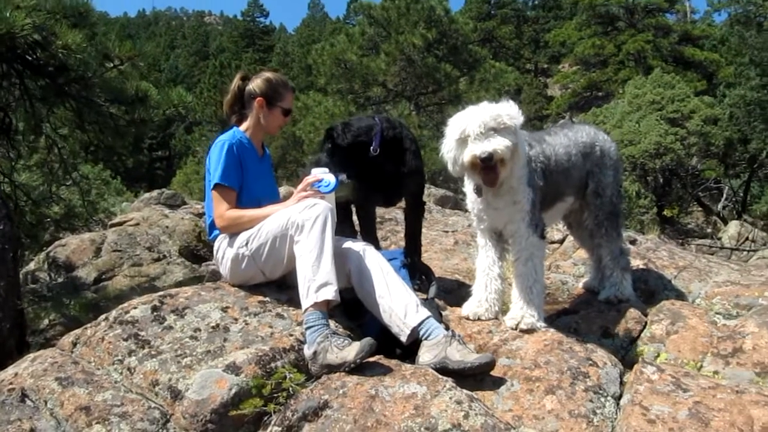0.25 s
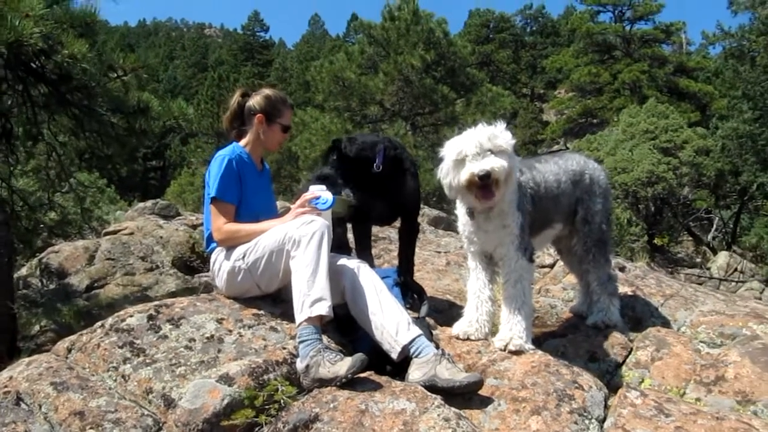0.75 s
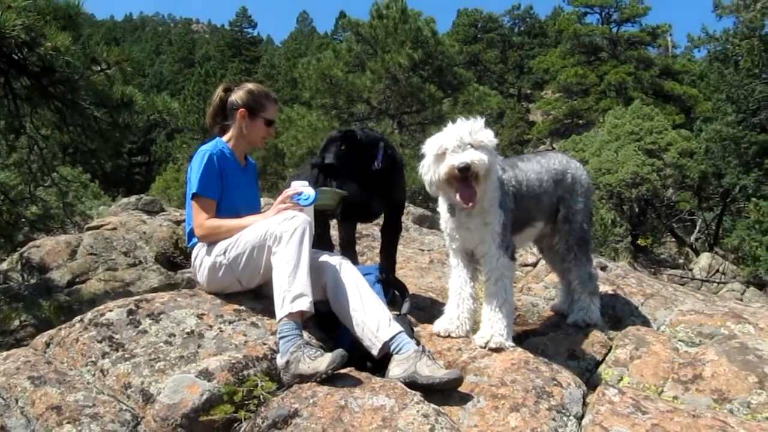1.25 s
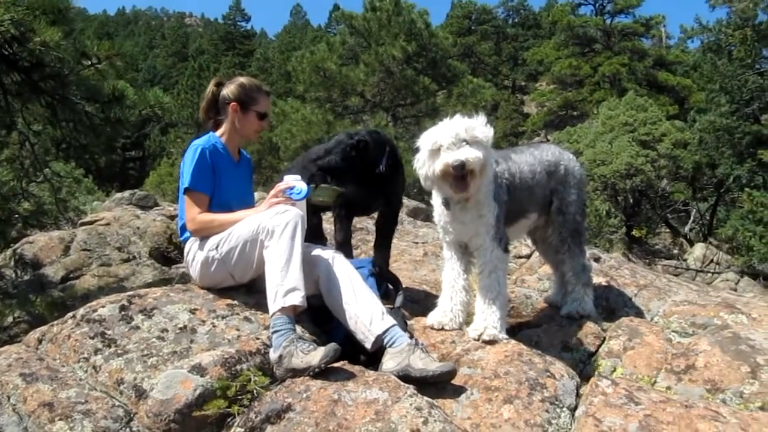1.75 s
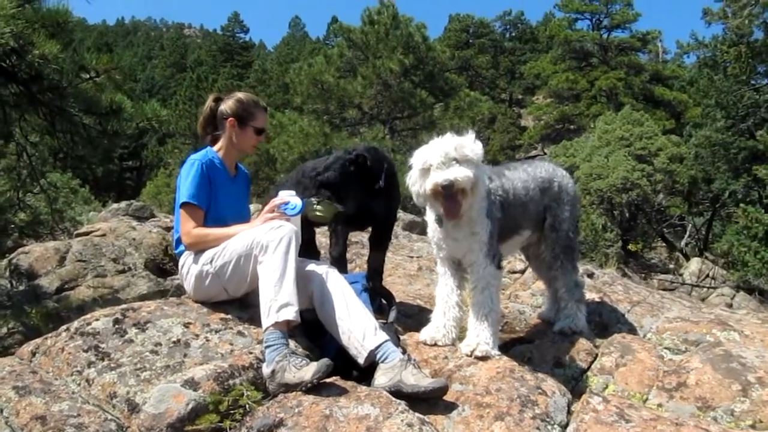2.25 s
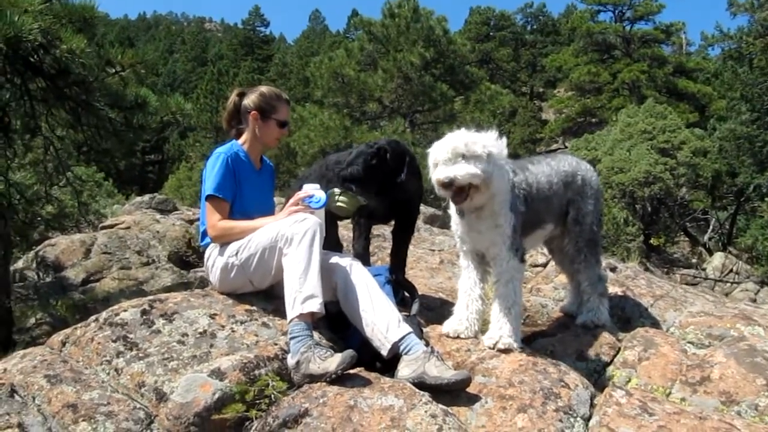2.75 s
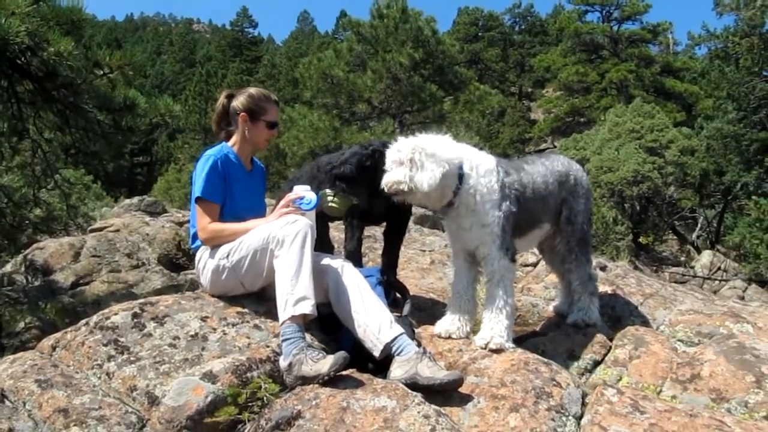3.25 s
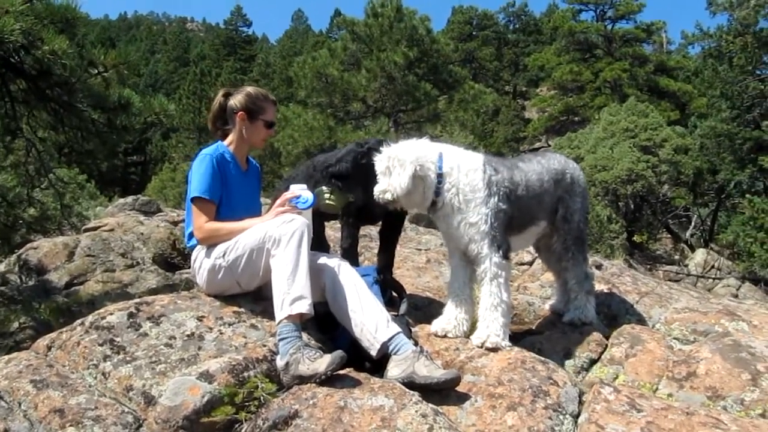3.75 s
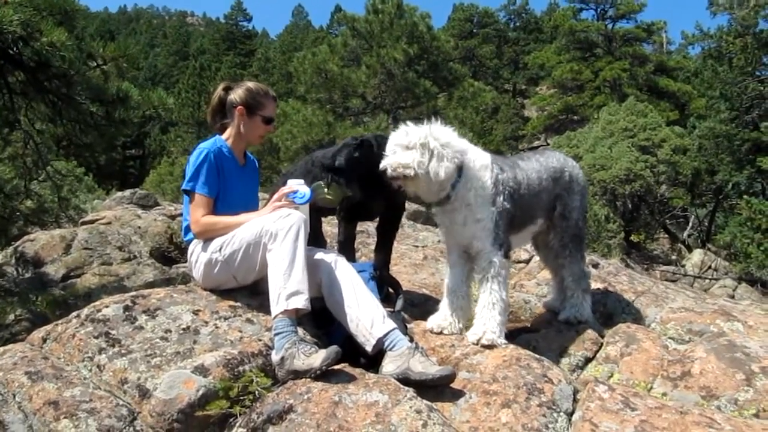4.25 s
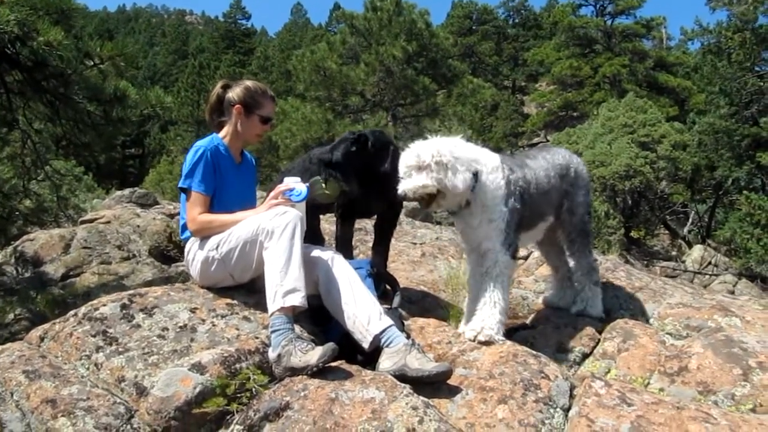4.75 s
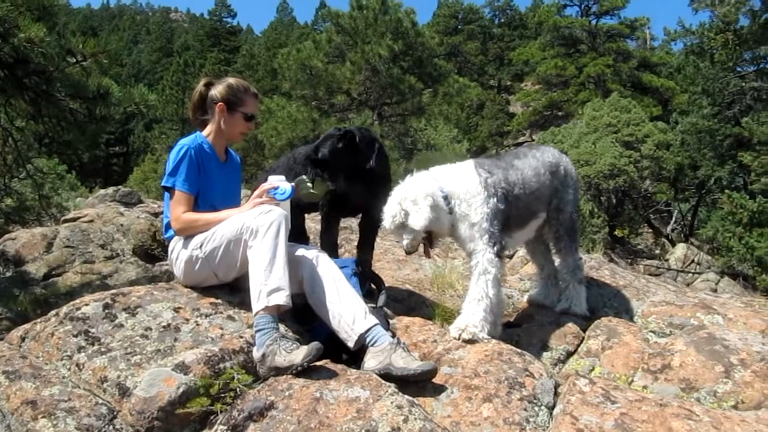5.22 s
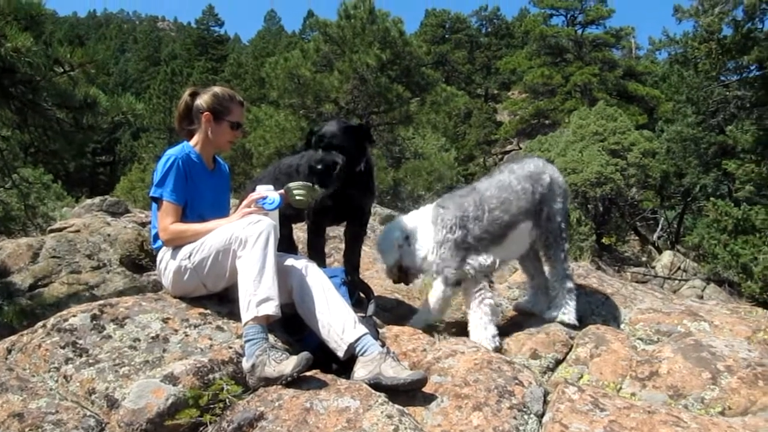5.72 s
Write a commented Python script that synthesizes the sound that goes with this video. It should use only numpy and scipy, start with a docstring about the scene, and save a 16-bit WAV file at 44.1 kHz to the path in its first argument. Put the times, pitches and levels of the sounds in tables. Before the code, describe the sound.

A dog drinks from a small cup outdoors, roughly three laps a second throughout. Each lap is a small cluster of hollow, bubbly plops, wet slaps, crackling spray and ticking drips, soft at first and fuller from about 2 seconds, strongest around 4.3 to 4.7. A second dog pants close by, breathy puffs about every 0.3 seconds until 3.1, then only a few at 4.3, 4.9 and 5.3. Behind are quiet air, a low wavering drone that fades after the first second, faint pine hiss, and a barely audible high insect-like trill and thin steady whine. Wind rumble rises after 2.2, thumping the microphone hardest at 3.3 to 4.0, again near 4.9 and 5.4. The cup snaps sharply at 4.98. Claws scrape faintly from 5.4, with harsh gritty clicks at 5.75; light metal tags clink at 5.6 and 5.9. Close reflections only, no room echo.

```python
"""On a rocky hilltop a dog laps water from a small cup, three laps a second, and pants as it drinks. Each lap
is a few plops of trapped air, made as ringing bubbles, and a spray of tiny bursts of noise. Shaped noise makes
the air, pines, far drone, panting and the wind that rises and buffets the microphone. Near the end the cup
snaps once, claws scrape on the rock in gritty clicks and metal collar tags clink."""
import sys
import numpy as np
from scipy import signal
from scipy.fft import rfft, irfft
from scipy.io import wavfile
from scipy.ndimage import uniform_filter1d, map_coordinates

SR = 44100
rng = np.random.default_rng(int(sys.argv[2]) if len(sys.argv) > 2 else 0)


def log_audio(samples):
    """Write samples as a 16-bit WAV file to the path given in sys.argv[1]."""
    # one column per channel
    frames = np.atleast_2d(samples).T
    # limit to full scale, then quantise
    limited = np.clip(frames, -1, 1)
    pcm = np.round(limited * 32767).astype(np.int16)
    wavfile.write(sys.argv[1], SR, pcm)


N = 263718
TIME = np.arange(N) / SR


def gain_of(db):
    """Turns decibels into a plain multiplier."""
    return 10 ** (np.asarray(db) / 20)


def evened(x):
    """Scales a sound to an average strength (rms) of 1."""
    return x / np.sqrt(np.mean(x ** 2) + 1e-20)


def level(curve):
    """The multiplier at every sample, drawn through rows of t/s, level/dB."""
    return gain_of(np.interp(TIME, *np.transpose(curve)))


def add(mix, s, sound):
    """Mixes a sound in, starting at time s."""
    part = mix[max(round(s * SR), 0):][:len(sound)]
    part += sound[:len(part)]


def gains(points, size):
    """Reads a colour, given as rows of f/Hz, level/dB, at each frequency of an FFT."""
    hz, db = np.transpose(points)
    fft_hz = np.fft.rfftfreq(size, 1 / SR)
    return gain_of(np.interp(np.log(fft_hz + 1), np.log(hz), db))


def noise(points):
    """Steady noise of a given colour, rms 1."""
    spectrum = rfft(rng.standard_normal(N))
    return evened(irfft(spectrum * gains(points, N), N))


def click(points, size=512):
    """A click of a given colour with its energy packed at the start (minimum phase), energy 1."""
    cepstrum = irfft(np.log(gains(points, size)))
    # folding the second half onto the first leaves nothing before the click starts
    cepstrum[1:size // 2] *= 2
    cepstrum[size // 2 + 1:] = 0
    pulse = irfft(np.exp(rfft(cepstrum)))
    return pulse / np.linalg.norm(pulse)


def band(x, lo_hz, hi_hz, order=2):
    """Keeps mainly the sound between two frequencies."""
    edges_hz = [lo_hz, min(hi_hz, SR / 2 - 1)]
    return signal.sosfilt(signal.butter(order, edges_hz, "band", fs=SR, output="sos"), x)


def swell(length_s, taper):
    """A smooth rise, hold and fall; taper is the share spent rising and falling."""
    return signal.windows.tukey(int(length_s * SR), taper)


def bubble(hz, t60_s, glide, rise_turns):
    """A pocket of air rings and dies, its pitch sliding as it changes size."""
    t = np.arange(int(t60_s * SR) + 2) / SR
    turns = np.cumsum(hz * np.exp(glide * t / t60_s)) / SR
    fade = gain_of(-60 * t / t60_s)
    return np.sin(2 * np.pi * turns) * fade * (1 - np.exp(-turns / rise_turns))


def splat(hz, t60_s, ring_share=0.28, width=0.15):
    """A wet film tears: a tiny burst of noise that partly rings at one pitch, energy 1."""
    t = np.arange(int(t60_s * SR) + 16) / SR
    burst = rng.standard_normal(len(t)) * t * gain_of(-80 * t / t60_s)
    share = np.clip(ring_share, 0, 1)
    ringing = evened(band(burst, hz / (1 + width / 2), hz * (1 + width / 2), order=1))
    sound = share * ringing + (1 - share) * evened(burst)
    return sound / np.linalg.norm(sound)


def ring(modes, size=10000):
    """A struck solid rings as a sum of fading tones, one for each mode."""
    t = np.arange(size) / SR
    return sum(gain_of(db - 60 * t / t60) * np.sin(2 * np.pi * hz * t) for hz, db, t60 in modes)


# Colour of the still air and trees [f/Hz, level/dB]
AIR_COLOUR = [(18, -46), (30, 5), (77, -5.5), (134, 2.5), (194, -4), (364, -4.5), (540, -4), (1320, -13),
              (1810, -18.5), (2120, -19.5), (6550, -40), (7870, -28), (8520, -31), (11400, -41),
              (16000, -40)]
# Loudness of the air over time, before its layer gain [t/s, level/dB]
AIR_LEVEL = [(0.0, -44.5), (2.65, -41), (5.98, -47)]
# Colour of the high hiss of the pines [f/Hz, level/dB]
PINES_COLOUR = [(1500, -20), (3000, 7.5), (4500, 5.5), (7000, 0), (10500, 1), (15500, -12)]
# Loudness of the pines over time [t/s, level/dB]
PINES_LEVEL = [(0, -50), (.9, -50.5), (1.5, -56.5), (2.6, -60), (3.6, -63), (5.98, -50)]
# Colour of a far drone [f/Hz, level/dB]
DRONE_COLOUR = [(80, -7), (135, 2), (220, 5), (360, 3.5), (480, -13.5), (900, -22), (4000, -60)]
# Loudness of the far drone over time [t/s, level/dB]
DRONE_LEVEL = [(0, -32.5), (.25, -34), (.6, -31.5), (1, -44), (1.6, -43), (2.4, -42.5), (3.2, -59),
               (5.98, -45)]


def hilltop(air_db=1, hum_db=-6, hum_hz=144):
    """Open air, pines and a far drone are shaped noise; a narrow band of noise makes the drone's wavering hum."""
    air = noise(AIR_COLOUR)
    # the air's loudness is set by its middle band
    air = air / np.std(band(air, 400, 1500))
    hum = evened(band(rng.standard_normal(N), hum_hz - 6, hum_hz + 6))
    drone = noise(DRONE_COLOUR) + gain_of(hum_db) * hum
    out = gain_of(air_db) * level(AIR_LEVEL) * air
    out += level(PINES_LEVEL) * noise(PINES_COLOUR)
    return out + level(DRONE_LEVEL) * drone


def trill(db=-67.0, hz=11400, width_hz=300, first_s=0.24, length_s=0.4):
    """A faint high trill, perhaps an insect: narrow noise that comes and goes once a second."""
    bouts = np.zeros(N)
    for s in np.arange(first_s, N / SR, 1):
        add(bouts, s, swell(length_s, taper=0.32))
    tone = evened(band(rng.standard_normal(N), hz - width_hz / 2, hz + width_hz / 2))
    return gain_of(db) * bouts * tone


# Strength of the breeze on the microphone, before the layer gains [t/s, level/dB]
BREEZE_LEVEL = [(2.2, -58), (2.47, -30.5), (3.32, -22.5), (3.49, -31), (3.67, -16), (3.75, -18.5),
                (4.12, -29), (4.15, -41), (4.18, -24), (4.65, -33.5), (4.96, -17), (5.01, -39.5),
                (5.31, -24.5), (5.34, -36), (5.38, -20), (5.44, -30.5), (5.86, -38), (5.98, -44)]
# Colour of the wind's low rumble [f/Hz, level/dB]
RUMBLE_COLOUR = [(8, 0.5), (25, 5), (60, -0.5), (120, -11.5), (250, -24.5), (500, -40), (4000, -100)]
# Colour of the wind's turbulence [f/Hz, level/dB]
TURBULENCE_COLOUR = [(30, -15), (90, 6), (180, -7), (300, -4), (600, -23), (3000, -82)]
# The strongest eddies that hit the microphone [middle t/s, length t/s, level/dB, upper edge f/Hz]
EDDY_HITS = [(1.295, 0.047, -21, 122), (2.749, 0.06, -14, 176), (2.831, 0.086, -22, 186),
             (3.319, 0.024, -6.5, 316), (3.361, 0.12, -19.5, 170), (3.444, 0.031, -13.5, 225),
             (3.48, 0.037, -9, 172.5), (3.62, 0.035, -14.5, 294), (3.67, 0.037, -10.5, 129),
             (3.703, .05, -9.5, 183), (3.746, .09, -16.5, 216), (3.863, 0.022, -7, 436),
             (3.9, 0.084, -17.5, 273), (3.932, 0.021, -6, 564), (3.95, 0.043, -7, 320),
             (4.079, 0.035, -21.5, 150), (4.188, 0.046, -18, 137), (4.244, 0.031, -20, 184),
             (4.322, 0.035, -18.5, 117), (4.905, 0.064, -12, 207), (4.917, 0.032, -12.5, 440),
             (4.945, 0.067, -12.5, 148), (5.379, 0.025, -15.5, 169)]


def wind(breeze_db=2, turbulence_db=-28, growth=1.63, eddy_db=0, centre=0.32, calm_until_s=2.08, rise_s=0.255):
    """Moving air makes a low rumble, turbulence that grows faster than the breeze, and single eddies."""
    breeze = level(BREEZE_LEVEL) * np.clip((TIME - calm_until_s) / rise_s, 0, 1)
    out = gain_of(breeze_db) * breeze * noise(RUMBLE_COLOUR)
    out += gain_of(turbulence_db) * (breeze / breeze.max()) ** growth * noise(TURBULENCE_COLOUR)
    for s, length_s, db, hz in EDDY_HITS:
        gust = swell(length_s, taper=0.9)
        f = np.fft.rfftfreq(len(gust), 1 / SR) / (centre * hz)
        # random phases under a hump that falls away towards the upper edge
        hump = f ** 2 * np.exp(-1.4 * f + 2j * np.pi * rng.random(len(f)))
        eddy = evened(irfft(hump, len(gust)) * gust) * np.sqrt(np.mean(gust ** 2))
        add(out, s - len(gust) / SR / 2, gain_of(db + eddy_db) * eddy)
    return out


# Claws on the rock [t/s, length t/s, level/dB, slips per second f/Hz]
CLAW_SCRAPES = [(5.442, 0.089, -45, 181), (5.658, 0.056, -37.5, 294), (5.7418, 0.0063, -19, 900),
                (5.747, 0.01, -14.5, 1500), (5.754, 0.012, -26, 457), (5.767, 0.0291, -27.5, 600),
                (5.808, 0.007, -18, 1100), (5.843, 0.11, -49.5, 400)]
# Colour of scraped rock, also used for the tags' chatter [f/Hz, level/dB]
ROCK_COLOUR = [(300, -15), (1200, -4.5), (3300, 3), (4800, 0.5), (7500, -9), (10800, -2), (15500, -22)]


def claws(size_db=4, grit=0.25, slip_s=0.00045):
    """A claw slips over grains of rock in an uneven rush of gritty clicks."""
    out = np.zeros(N)
    for s, length_s, db, per_s in CLAW_SCRAPES:
        n = int(length_s * SR)
        slips = np.zeros(n)
        at = rng.integers(0, n, int(length_s * per_s) + 1)
        slips[at] = gain_of(size_db * rng.standard_normal(len(at)))
        # each slip starts suddenly and dies away
        fading = signal.lfilter([1], [1, -np.exp(-1 / (slip_s * SR))], slips)
        force = evened(fading) + grit
        add(out, s, gain_of(db) * evened(force * rng.standard_normal(n)))
    return signal.oaconvolve(out, click(ROCK_COLOUR))[:N]


# Collar tags touching, before the layer gains [t/s, level/dB, share of the second tag 0-1]
TAG_CLINKS = [(5.5922, -27.5, 0.21), (5.886, -24.5, 0.8), (5.897, -29.5, 1), (5.973, -36.5, 1)]
# Ringing modes of the first tag [f/Hz, level/dB, time to fall 60 dB t/s]
FIRST_TAG_MODES = [(4850, -1.5, 0.0564), (10300, -16, 0.076), (13640, -5.5, 0.095)]
# Ringing modes of the second tag [f/Hz, level/dB, time to fall 60 dB t/s]
SECOND_TAG_MODES = [(6533, -12, 0.07), (10160, -4.5, 0.14), (11560, -15, 0.066), (13730, -7, 0.071)]


def tags(ring_db=3, chatter_db=-3, chatter_t60_s=0.039, size=4000):
    """Two thin metal tags ring, chattering against each other as they touch."""
    out, t = np.zeros(N), np.arange(size) / SR
    for s, db, share in TAG_CLINKS:
        ringing = (1 - share) * ring(FIRST_TAG_MODES) + share * ring(SECOND_TAG_MODES)
        add(out, s, gain_of(db + ring_db) * ringing)
        # cubing the noise makes it spiky
        chatter = evened(rng.standard_normal(size) ** 3) * gain_of(-60 * t / chatter_t60_s)
        add(out, s, gain_of(db + chatter_db) * np.convolve(chatter, click(ROCK_COLOUR)))
    return out


# The cup flexes: two close parts of one snap [t/s, level/dB]
CUP_SNAPS = [(4.9802, -14.5), (4.9809, -2)]
# Ringing modes of the cup [f/Hz, level/dB, time to fall 60 dB t/s]
CUP_MODES = [(1224, -16, 0.026), (1970, -9, 0.0087), (3100, 0.5, 0.012), (5440, -9.5, 0.0034),
             (7860, -10.5, 0.0043), (9540, -11.5, 0.005), (11050, -12.5, 0.0062), (12500, -18, 0.0057)]


def cup(crunch_db=-9, crunch_t60_s=0.012, rise_s=.0001):
    """The stiff little cup flexes and snaps: its modes ring, with a short dull crunch."""
    out, body = np.zeros(N), ring(CUP_MODES)
    body = body * (1 - np.exp(-np.arange(len(body)) / SR / rise_s))
    for s, db in CUP_SNAPS:
        crunch = band(splat(2000, crunch_t60_s), 670, 3700)
        add(out, s, gain_of(db) * body)
        add(out, s, gain_of(db + crunch_db) * crunch / abs(crunch).max())
    return out


# The dog's pants, before the layer gain [middle of the puff out t/s, level/dB]
PANT_PUFFS = [(0.068, -47), (0.238, -45.5), (0.539, -45), (0.838, -45), (1.147, -41.5), (1.451, -46),
              (1.746, -47), (1.994, -48), (2.256, -44.5), (2.536, -45), (2.786, -47), (3.1, -50),
              (4.267, -54), (4.906, -48), (5.329, -48.5)]
# Colour of breath through the open muzzle [f/Hz, level/dB]
MUZZLE_COLOUR = [(500, -16), (1300, -2), (1800, -6.5), (2150, 4.5), (2500, -3), (2950, 8.5), (3300, 1.5),
                 (3800, -10.5), (4800, -11.5), (12000, -31)]
# each puff out is followed by a weaker draw of air in
PUFF_S, DRAW_S, DRAW_LAG_S, DRAW_DB = .11, .09, .138, -8.5


def panting(db=4.5, rasp_db=2, opening=.07, taper=.7, size=200):
    """Air hisses out and in through the dog's open muzzle, fluttering over the wet tongue."""
    flow = np.zeros(N)
    for s, puff_db in PANT_PUFFS:
        add(flow, s - PUFF_S / 2, gain_of(puff_db) * swell(PUFF_S, taper))
        add(flow, s + DRAW_LAG_S - DRAW_S / 2, gain_of(puff_db + DRAW_DB) * swell(DRAW_S, taper))
    # the mouth opens with the effort: reading the noise faster raises its resonances
    pace = 1 + opening * (np.sqrt(flow / flow.max()) - .5)
    hiss = map_coordinates(noise(MUZZLE_COLOUR), [np.cumsum(pace)], mode="wrap")
    flutter = gain_of(rasp_db * evened(uniform_filter1d(rng.standard_normal(N), size)))
    return gain_of(db) * flow * evened(flutter * hiss)


# Strokes of the tongue [t/s, length t/s, level/dB]; the level drives spray and gurgle
TONGUE_LAPS = [(0.1, 0.087, -54), (0.406, 0.15, -46), (0.6, 0.25, -48), (0.955, 0.14, -53),
               (1.18, 0.055, -49), (1.488, 0.08, -47.5), (1.765, 0.15, -49.5), (2.079, 0.098, -44),
               (2.379, 0.099, -48), (2.655, 0.12, -46), (3.041, 0.087, -44.5), (3.328, 0.1, -46.5),
               (3.642, 0.113, -48.5), (3.97, 0.069, -51.5), (4.278, 0.092, -45.5), (4.632, 0.13, -41),
               (4.992, 0.099, -48), (5.293, 0.15, -48)]


def lap_flow():
    """How much water the tongue is throwing at each moment."""
    flow = np.zeros(N)
    for s, length_s, lap_db in TONGUE_LAPS:
        add(flow, s, gain_of(lap_db) * swell(length_s, taper=0.38))
    return flow


def gurgle(db=-3, per_s=170, size_db=4, between_db=-52, cycles=30, rise=0.32, count=30):
    """Small bubbles pop in the stirred water, mostly rising in pitch, and go on between the laps."""
    pops = np.zeros(N)
    for hz in np.geomspace(1100, 6000, count):
        sizes = gain_of(size_db * np.minimum(rng.exponential(1, N), 3))
        hits = (rng.random(N) < per_s / count / SR) * sizes
        pop = bubble(hz, cycles / hz, rng.normal(rise, rise), rise_turns=2.9)
        pops += signal.oaconvolve(hits, pop)[:N]
    return gain_of(db) * evened(pops) * np.hypot(lap_flow(), gain_of(between_db))


# Colour of spray, also used for the drips and ticks [f/Hz, level/dB]
SPRAY_COLOUR = [(400, -46.5), (1200, 2), (3000, 3), (5000, 2.5), (7500, -4.5), (10500, 4.5), (15500, -16.5)]


def spray(db=1, per_s=800, size_db=4, between_db=-58, t60_s=0.0057, count=40):
    """Droplets and bursting films crackle, strong during each lap and faint as the muzzle drips in between."""
    drops = np.zeros(N)
    for hz in np.geomspace(1000, 12000, count):
        sizes = gain_of(size_db * np.minimum(rng.exponential(1, N), 3.5))
        hits = (rng.random(N) < per_s / count / SR) * sizes
        # small drops ring higher and tend to die sooner
        grain = splat(hz, t60_s * np.sqrt(4000 / hz) * rng.uniform(0.29, 2.6), ring_share=0.73)
        drops += signal.oaconvolve(hits, grain)[:N]
    coloured = evened(signal.oaconvolve(drops, click(SPRAY_COLOUR))[:N])
    return gain_of(db) * coloured * np.hypot(lap_flow(), gain_of(between_db))


def dribble(plop_db=-32, tick_db=-32, plop_hz=1600, tick_hz=7000, plop_octaves=0.84, tick_octaves=.6,
            t60_s=0.027, tick_t60_s=0.0092, count=2):
    """Every lap spills a few soft plops back into the cup and makes a few faint ticks."""
    out = np.zeros(N)
    for (s, length_s, _), draws in zip(TONGUE_LAPS, rng.random((len(TONGUE_LAPS), count, 4))):
        for fall, plop_pitch, when, tick_pitch in draws:
            low_hz = plop_hz * 2 ** (plop_octaves * (2 * plop_pitch - 1))
            plop = splat(low_hz, t60_s, ring_share=0.94)
            add(out, s + fall * length_s, gain_of(plop_db) * plop / abs(plop).max())
            high_hz = tick_hz * 2 ** (tick_octaves * (2 * tick_pitch - 1))
            tick = np.convolve(splat(high_hz, tick_t60_s, ring_share=0.28), click(SPRAY_COLOUR))
            add(out, s + when * length_s, gain_of(tick_db) * tick / abs(tick).max())
    return out


# The loudest drips [t/s, peak level/dB, ring f/Hz]
LOUD_DRIPS = [(0.249, -24, 8600), (0.7924, -23, 5630), (0.8457, -27.5, 4660), (0.97, -24.5, 4870),
              (1.2162, -27.5, 7760), (1.8636, -26, 9700), (2.1083, -31, 9700), (2.289, -23.5, 4660),
              (2.4174, -31, 6100), (2.767, -28.5, 5100), (2.9626, -29, 4450), (3.0585, -24, 6450),
              (3.4414, -22.5, 4500), (3.8114, -24.5, 9100), (4.0258, -27.5, 10470), (4.302, -19.5, 5300),
              (4.723, -21.5, 10300), (4.8061, -27.5, 5200), (5.3605, -21.5, 10470), (5.3804, -26.5, 5300),
              (5.487, -26, 5130)]


def drips(db=0, t60_s=0.0078):
    """Single drops tick in short wet bursts."""
    out = np.zeros(N)
    for s, drip_db, hz in LOUD_DRIPS:
        sound = np.convolve(splat(hz, t60_s, ring_share=0.54), click(SPRAY_COLOUR))
        add(out, s, gain_of(drip_db + db) * sound / abs(sound).max())
    return out


# The loudest air pockets closed by the tongue, before the layer gains
# [t/s, level/dB, starting ring f/Hz, splashiness 0-1]
AIR_POCKETS = [(0.1804, -28.5, 1039, 0), (0.4716, -20, 730, 0), (0.5613, -27.5, 1520, 0.14),
               (0.6383, -29.5, 2420, 0), (1.0658, -32.5, 1890, 0.7), (1.2078, -27, 1420, 0.6),
               (1.3107, -28, 2250, 0), (1.5632, -25.5, 2750, 0.3), (1.9802, -19.5, 1370, 0.1),
               (2.2111, -24.5, 1085, 0.63), (2.4005, -23.5, 1623, 0.32), (2.586, -21, 1270, 0.1),
               (2.594, -23, 1219, .2), (2.6882, -18, 970, 0.32), (2.9528, -24.5, 2010, 0.6),
               (3.0324, -18.5, 1326, 0.28), (3.047, -21.5, 1980, 0), (3.0533, -18.5, 655, 0.44),
               (3.1336, -23.5, 1580, 0.44), (3.277, -24.5, 1184, 0.3), (3.347, -16, 790, 0.34),
               (3.3897, -26.5, 2630, 0.07), (3.4827, -25.5, 750, 0.4), (3.673, -22, 1650, 0.93),
               (3.695, -24, 1990, .4), (3.7191, -25, 1460, .4), (3.8123, -22, 1130, 0.6),
               (4.0352, -23, 1535, 0.1), (4.2944, -26, 3120, .6), (4.3003, -16, 1570, 0.44),
               (4.305, -17, 1220, 0.3), (4.3393, -18.5, 1524, 0.26), (4.6485, -27.5, 2187, .7),
               (4.6607, -18, 694, 0.96), (4.6703, -14, 1494, 0.1), (4.803, -19, 970, 0),
               (5.12, -30, 746, 1)]
# every main pocket dies this fast; pitches slide up or down by a random multiple of the glide
PLOP_T60_S, PLOP_GLIDE = 0.023, .27


def plops(main_db=1, side_db=-4, slap_db=-6, slap_t60_s=0.032, spread=0.403, lag_s=0.0072,
          side_t60_s=0.027, count=6):
    """Each plop is one main air pocket in a wet slap; splashy ones break into more pockets just after."""
    out = np.zeros(N)
    for (s, db, hz, splash), draw in zip(AIR_POCKETS, rng.standard_normal((len(AIR_POCKETS), count, 3))):
        main = bubble(hz, PLOP_T60_S, PLOP_GLIDE * draw[0, 0], rise_turns=0.72)
        add(out, s, gain_of(db + main_db) * main)
        slap = band(splat(hz, slap_t60_s, ring_share=0.41), 330, 4400)
        # the slap starts 2 ms before the pocket
        add(out, s - .002, gain_of(db + slap_db) * slap / abs(slap).max())
        for k, (pitch, delay, slide) in enumerate(draw):
            side_hz = np.clip(np.sqrt(hz * 2000) * np.exp(spread * pitch), 500, 7000)
            pocket = np.sign(slide) * bubble(side_hz, side_t60_s, PLOP_GLIDE * slide, rise_turns=0.26)
            add(out, s + lag_s * abs(delay) * k / count, gain_of(db + side_db) * splash * pocket)
    return out


def surroundings(x, wet_db=-12, t60_s=0.0697, size=6000):
    """Short scattered reflections from the rock and the bodies nearby; no room."""
    t = np.arange(size) / SR
    scattered = rng.standard_normal(size) * (rng.random(size) < .06)
    tail = scattered * (t > .0015) * gain_of(-60 * t / t60_s)
    return x + gain_of(wet_db) * signal.oaconvolve(x, tail / np.linalg.norm(tail))[:N]


def scene():
    """The hilltop behind, the wind on the microphone, and the dog close by."""
    background = hilltop() + trill() + wind()
    lapping = gurgle() + spray() + dribble() + drips() + plops()
    dog = surroundings(claws() + panting() + lapping)
    snap = surroundings(cup(), wet_db=-12.5, t60_s=0.066)
    return (background + tags() + snap + dog)[None]


# Colour of the microphone [f/Hz, level/dB]
MICROPHONE_COLOUR = [(11300, -0.5), (13000, -2), (16000, -7.5)]
WHINE_HZ, EDGE_HZ = 7882, 15900  # steady whine; upper limit of the sound


def record(dry, whine_db=-63):
    """The microphone dulls the top; a faint whine joins, peaks round off at full scale, the band is limited."""
    whine = gain_of(whine_db) * np.sqrt(2) * np.sin(2 * np.pi * WHINE_HZ * TIME)
    loud = irfft(rfft(dry) * gains(MICROPHONE_COLOUR, N), N) + whine
    held = loud / (1 + loud ** 8) ** (1 / 8)
    low_pass = signal.firwin(511, EDGE_HZ, window=("kaiser", 9), fs=SR)
    return signal.oaconvolve(held, low_pass[None], "same")


dry = scene()
out = record(dry)
log_audio(out)
```